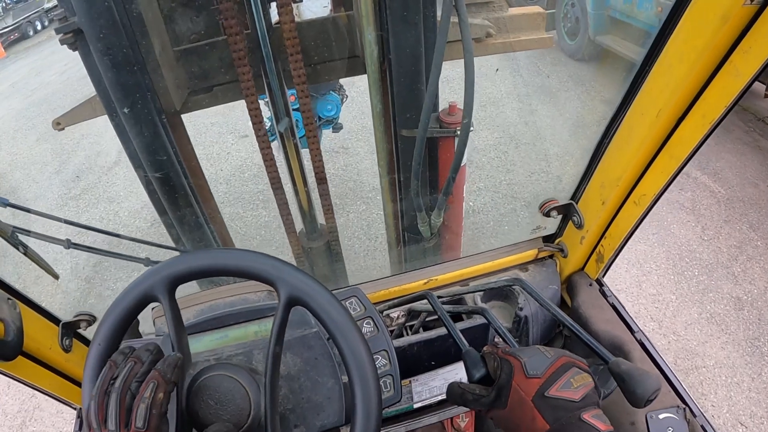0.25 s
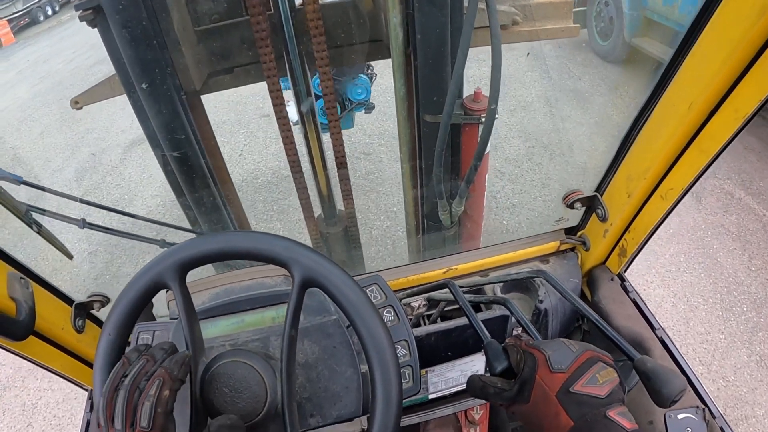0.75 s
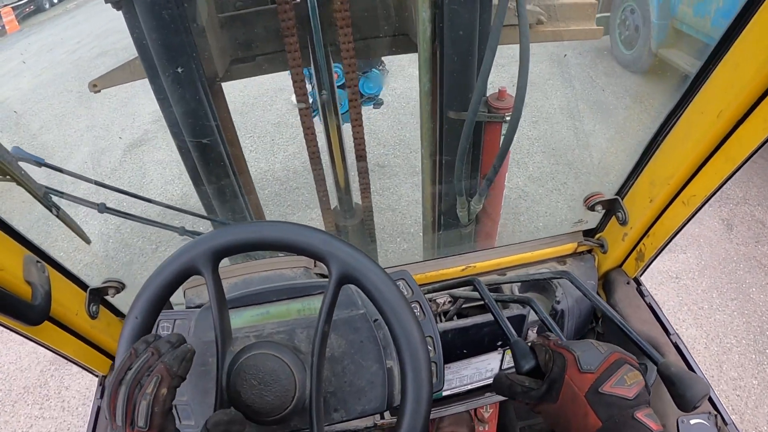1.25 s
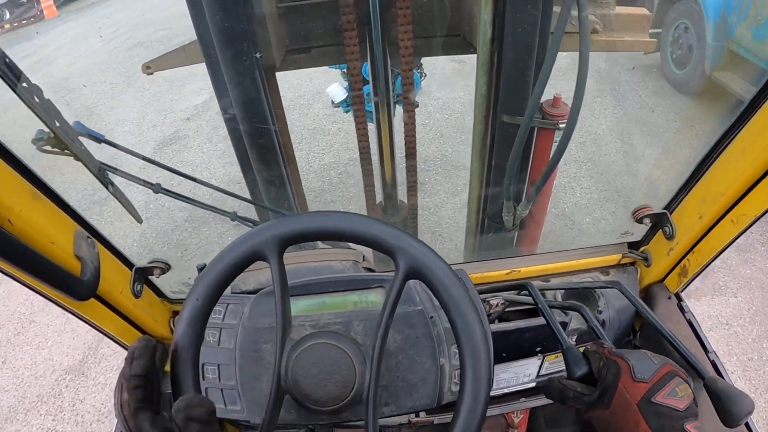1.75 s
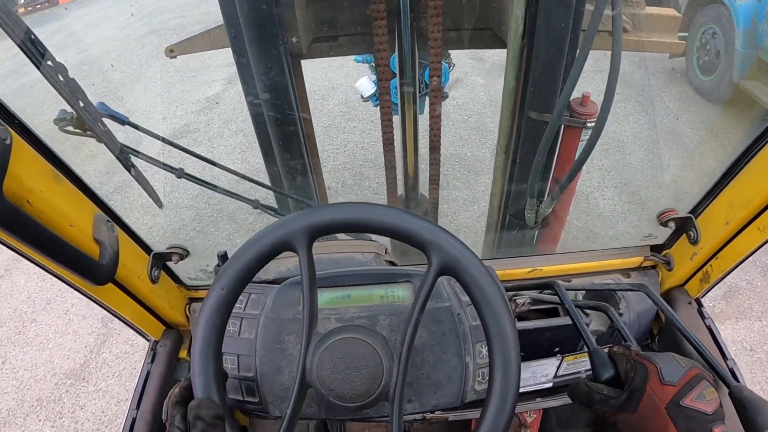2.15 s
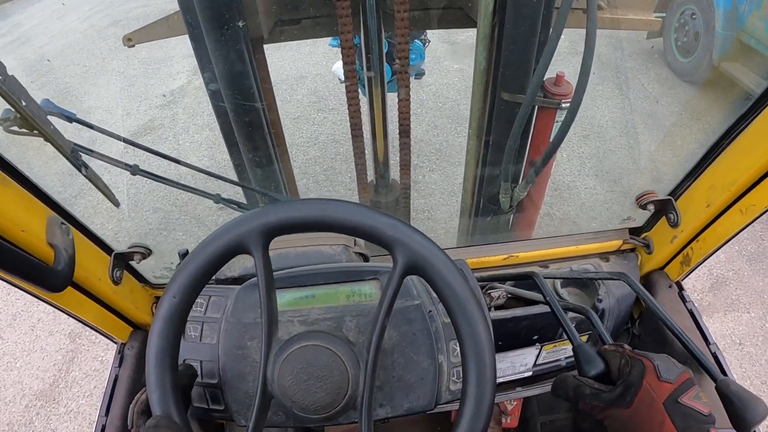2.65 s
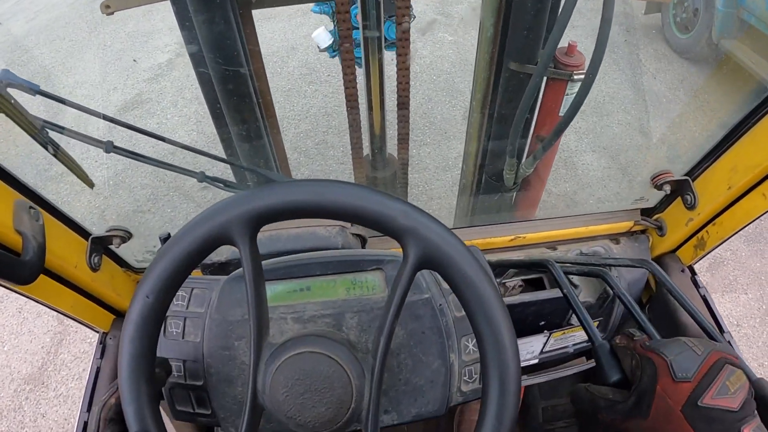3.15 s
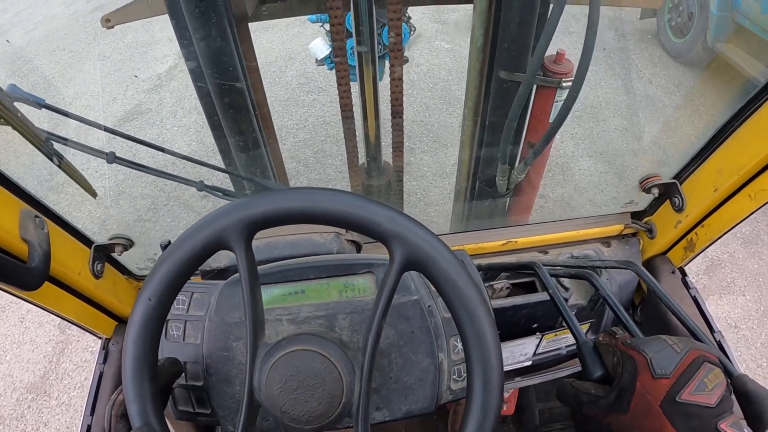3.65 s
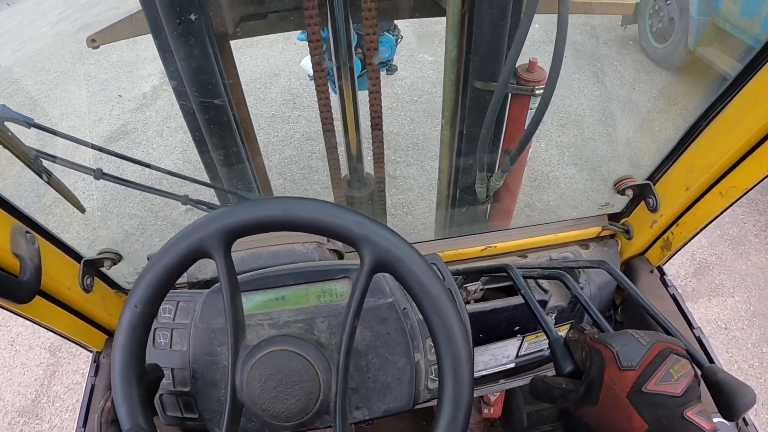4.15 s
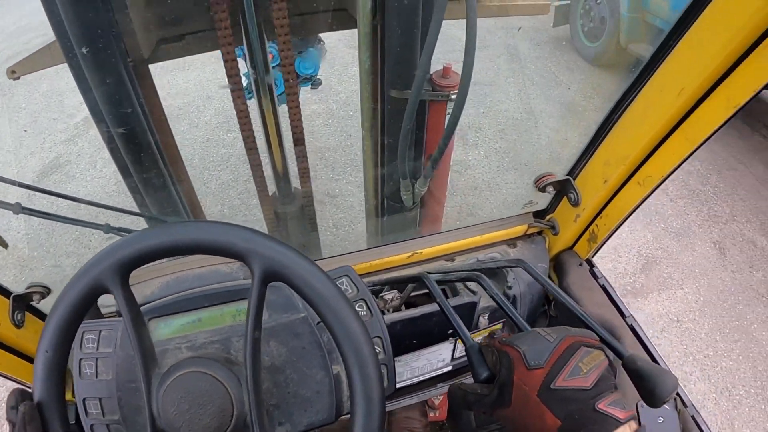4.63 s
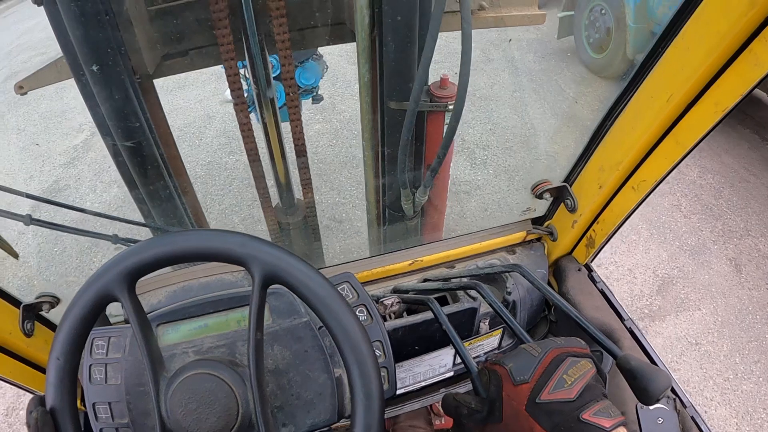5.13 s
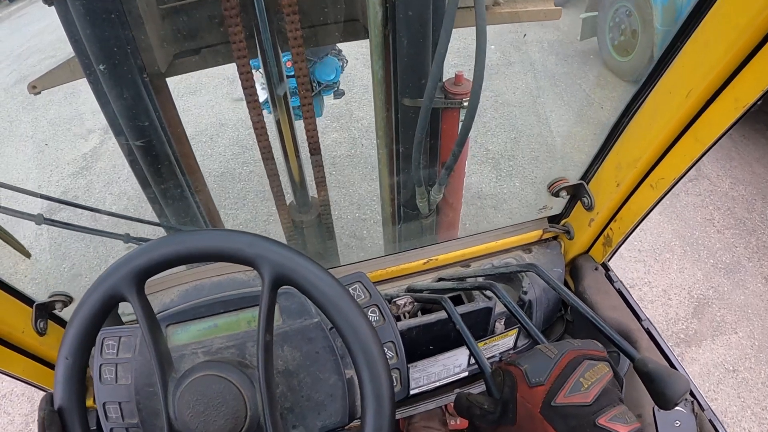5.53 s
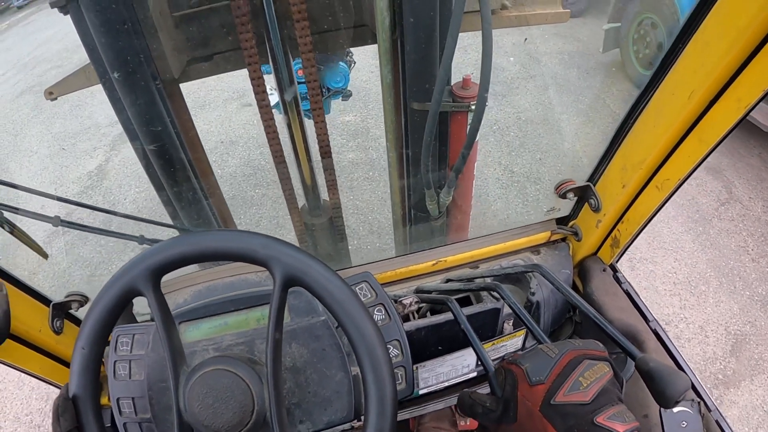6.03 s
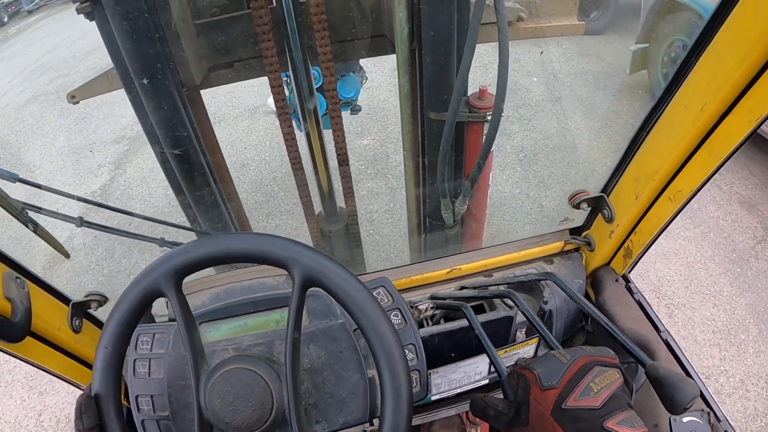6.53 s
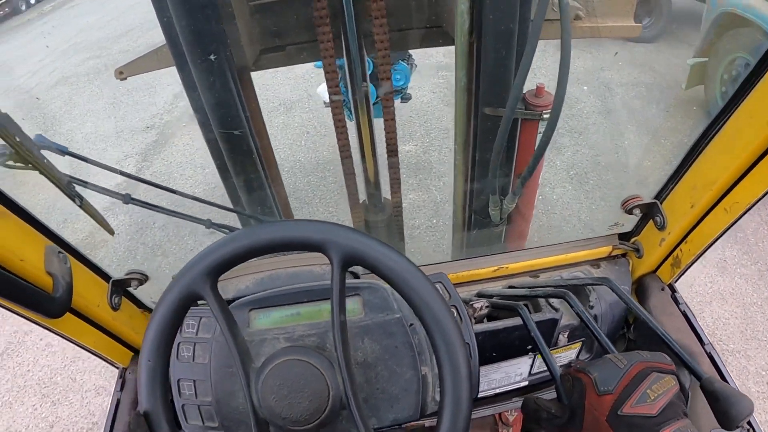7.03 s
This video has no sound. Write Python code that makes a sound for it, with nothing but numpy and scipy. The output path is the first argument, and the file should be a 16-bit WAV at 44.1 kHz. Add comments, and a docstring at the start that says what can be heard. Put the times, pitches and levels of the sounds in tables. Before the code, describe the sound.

A labouring diesel heard from the driver's seat: uneven chugging, a falling pump moan, loose metal rattles, one bright squeak and a late rev.

```python
"""Inside the cab of a diesel forklift that creeps across a yard under load, over the rumble of the drive.
At first the pump labours with a falling moan, and the engine sags and recovers.
After two seconds the engine sags again and surges; then come a strong squeak and its weaker neighbours.
Near five seconds the engine surges most, among the last clunks, and then it settles.
Each firing is a pulse that thumps the cab and rings the block; the other sounds are shaped noise and tones."""
import sys
import numpy as np
from scipy import signal
from scipy.fft import rfft, irfft
from scipy.io import wavfile
from scipy.ndimage import uniform_filter1d

SR = 44100
rng = np.random.default_rng(int(sys.argv[2]) if len(sys.argv) > 2 else 0)


def inscribe(sig):
    """Save sig as 16-bit PCM at rate SR to the path in sys.argv[1].

    A 1-D sig is mono; a 2-D sig holds one channel per row.
    Samples are clipped to [-1, 1] before scaling.
    """
    pcm = np.round(np.clip(np.atleast_2d(sig).T, -1, 1) * 32767)
    wavfile.write(sys.argv[1], SR, pcm.astype(np.int16))


N = 321048

# tone colour of the engine block: (frequency [Hz], level [dB])
BLOCK_COLOUR = [(130, -35.5), (230, 3.5), (310, -15.5), (380, -4), (480, -6), (570, -5.5), (680, -10.5),
                (970, -16), (1230, -19.5), (1700, -24.5), (4000, -50), (9000, -91)]
# ringing tones of the chain links: (frequency [Hz], level [dB])
LINK_MODES = [(3700, -2), (4600, -8), (5300, -3), (6250, -5), (6540, 1), (6850, -3), (8400, -6), (9600, -8),
              (10300, -11)]
IDLE_PER_S = 27  # firings per second from which speed effects are counted


def amp(db):
    """Turns decibels into a plain factor."""
    return 10 ** (np.asarray(db) / 20)


def evened(x):
    """Scales a sound to an average (RMS) strength of 1."""
    return x / np.sqrt(np.mean(x ** 2) + 1e-20)


def read(points, hz):
    """Reads a spectrum table at the given frequencies, on a logarithmic scale."""
    f, value = np.transpose(points)
    return np.interp(np.log(hz + 1), np.log(f + 1), value)


def curve(rows, t):
    """Reads every column of a time table at the times t."""
    s, *columns = np.transpose(rows)
    return [np.interp(t, s, c) for c in columns]


def add(mix, s, sound):
    """Adds a sound to the mix from second s on, cut at the end of the scene."""
    part = mix[..., round(s * SR):][..., :sound.shape[-1]]
    part += sound[..., :part.shape[-1]]


def resonate(x, hz, width):
    """A resonance of gain 1 at hz, fixed or moving: shift hz down to zero, smooth, shift back."""
    r = np.exp(-np.pi * width / SR)
    turn = np.exp(2j * np.pi * np.cumsum(hz * np.ones(x.shape[-1])) / SR)
    smoothed = signal.lfilter([1 - r], [1, -r], x / turn)
    return 2 * (turn * smoothed).real


def causal(x, colour, early=0):
    """Filters x by the shortest response with this colour; early moves a share of it ahead of the blow."""
    hz = abs(np.fft.fftfreq(2 ** 15, 1 / SR))
    log_gain = np.log(amp(read(colour, hz)))
    phase = (1 - early) * signal.hilbert(log_gain).imag
    response = np.fft.ifft(np.exp(log_gain - 1j * phase)).real
    return signal.oaconvolve(x, np.fft.fftshift(response), 'same')


def noise(colour, patchy_db):
    """Coloured noise with drifting patches, partly alike on the left and right."""
    # likeness of left and right: (frequency [Hz], likeness [0 to 1])
    likeness = [(130, 1), (290, 1), (630, 0.9), (1370, 0.81), (3000, 0.97), (8000, 0.59)]
    # how far the left leads: (frequency [Hz], phase [radians])
    left_lead = [(100, -0.19), (860, -0.36), (2800, -1.07), (5500, -0.58)]
    # left level minus right level: (frequency [Hz], difference [dB])
    left_tilt = [(200, 1.5), (1260, 2), (4200, -0.5), (10000, 2)]
    frames, hz = N // 256 + 5, np.fft.rfftfreq(1024, 1 / SR)
    a, b, c, d, patches = rng.standard_normal((frames, len(hz), 5)).T
    patches = uniform_filter1d(patches, size=12, axis=0)  # smooth over frequency
    patches = evened(uniform_filter1d(patches, size=10, axis=1))  # and over time
    same = np.clip(read(likeness, hz), -1, 1)[:, None]
    left = a + 1j * b
    right = same * left + np.sqrt(1 - same ** 2) * (c + 1j * d)
    # half of the difference goes to each side
    skew = (amp(read(left_tilt, hz) / 2) * np.exp(.5j * read(left_lead, hz)))[:, None]
    gain = amp(read(colour, hz)[:, None] + patchy_db * patches)
    z = np.array([left * skew, right / skew]) * gain
    return evened(signal.istft(z, nperseg=1024, noverlap=768)[1][:, :N])


def labour():
    """How hard the pump labours, from 1 down to 0."""
    halfway_s, fade_s = 1.41, 0.92
    return np.clip((halfway_s - np.arange(N) / SR) / fade_s + .5, 0, 1)


def roar():
    """Fan, pump and tyres: steady coloured noise."""
    # (frequency [Hz], level [dB])
    roar_colour = [(60, -35), (128, -12.5), (178, -8.5), (309, -17), (568, -32), (800, -47), (960, -25),
                   (1100, -34), (7640, -62.5), (12200, -99), (13200, -125)]
    return amp(-36) * noise(roar_colour, patchy_db=.7)


def oil_hiss():
    """Oil hisses as treble noise, more while the pump labours, and swells at times."""
    # (frequency [Hz], level [dB])
    hiss_colour = [(2000, -4.5), (4000, -6), (6500, -11), (7700, -11.5), (9000, -17), (12500, -25),
                   (13200, -72.5)]
    # swells: (centre time [s], half length [s], level [dB])
    spurts = [(1.887, 0.15, -55.5), (2.73, 0.33, -60.5), (4.98, 0.37, -63.5)]
    steady_db, labour_db = -62.5, 3
    t = np.arange(N) / SR
    level = amp(steady_db + labour_db * labour())
    level = level + sum(amp(db) * np.exp(-((t - s) / half) ** 2) for s, half, db in spurts)
    return level * noise(hiss_colour, patchy_db=1.2)


def pump_moan():
    """The labouring pump moans: noise through a narrow resonance that falls in pitch."""
    # (time [s], frequency [Hz], level [dB])
    moan_path = [(.3, 362.7, -39.5), (.9, 291, -41), (1.15, 275, -57.5)]
    width_hz = 32
    t = np.arange(N) / SR
    hz, level_db = curve(moan_path, t)
    moan = resonate(rng.standard_normal(N), hz, width_hz)
    moan = evened(resonate(moan, hz, width_hz))
    return amp(level_db - 60 * (t > moan_path[-1][0])) * moan  # all but silent after the last row


def drive():
    """Steady roar, a hiss of oil that swells at times, and the moan of the pump."""
    return roar() + oil_hiss() + pump_moan()


def booms():
    """Uneven ground keeps the low cab modes rolling: noise rings low resonances."""
    # cab modes: (frequency [Hz], width [Hz], level [dB])
    cab_modes = [(43, 9, -6), (68, 9, 3)]
    # strength of the booms: (time [s], level [dB])
    bumps = [(0, -28), (1.1, -23), (1.4, -25.5), (2.5, -28), (2.9, -26), (3.4, -26.5), (5.2, -23.5),
             (6.2, -26.5), (6.6, -21.5), (7.28, -24.5)]
    jolt = rng.standard_normal(N)
    rolling = sum(amp(db) * evened(resonate(resonate(jolt, hz, w), hz, w)) for hz, w, db in cab_modes)
    return amp(curve(bumps, np.arange(N) / SR)[0]) * rolling


def blow_of_noise(hz, octaves, rise, t60):
    """Noise around hz that rises and dies by 60 dB in t60, a little unlike left and right."""
    t, f = np.arange(2 ** 13) / SR, np.fft.rfftfreq(2 ** 13, 1 / SR)
    common, own = rng.standard_normal(len(t)), rng.standard_normal((2, len(t)))
    bell = np.exp(-.5 * (np.log2((f + 1) / hz) / octaves) ** 2)
    bell = bell / np.sqrt(f + hz)  # falls towards the treble
    band = evened(irfft(rfft(common + 0.91 * own) * bell))
    shape = (1 - np.exp(-t / max(rise, 1e-4))) * amp(-60 * t / t60)
    return band * shape / shape.max() * amp([[1.1], [-1.1]])  # louder on the left


def roughened(sound, depth_db, size):
    """Makes the level of a blow uneven by smoothed random swings."""
    swing = evened(uniform_filter1d(rng.standard_normal(sound.shape[1]), size=size))
    return sound * amp(depth_db * swing - 1)


def ticks():
    """Sharp bursts of noise that ring at the link modes, over a short lower body."""
    # (time [s], level [dB], centre frequency [Hz], level of the low body [dB])
    tick_list = [(0.117, -55, 7850, -65), (0.2, -45.5, 3000, -56), (0.517, -44, 3340, -62),
                 (0.598, -46.5, 4670, -40.5), (0.917, -43.5, 2950, -53), (1.188, -50, 3160, -65),
                 (1.255, -44, 3470, -49), (2.8686, -46, 3130, -60), (2.921, -47, 3430, -56),
                 (3.584, -47, 5200, -45), (4.3907, -43, 3100, -45), (6.0702, -49.5, 5600, -47),
                 (6.927, -55, 3440, -60), (7.21, -63, 7500, -67)]
    mix = np.zeros((2, N))
    for s, db, hz, body_db in tick_list:
        tick = blow_of_noise(hz, octaves=0.74, rise=.004, t60=.065)
        rings = sum(amp(3 * rng.standard_normal()) * resonate(tick, f, width=200) for f, _ in LINK_MODES)
        body = blow_of_noise(1480, octaves=.15, rise=.003, t60=.09)
        add(mix, s, amp(db) * (0.99 * tick + 0.5 * rings) + amp(body_db) * body)
    return mix


def clunks():
    """The load clunks on the forks: soft low thuds that ring the fork modes."""
    # (time [s], level [dB], centre frequency [Hz], width [octaves], time to die by 60 dB [s])
    clunk_list = [(0.185, -37, 980, 1, 0.25), (0.229, -48, 1790, 1, 0.23), (0.622, -42, 1070, 0.63, 0.25),
                  (0.781, -44, 1260, 1, 0.1), (.955, -50, 1480, 1, 0.12), (1.567, -47.5, 1324, 0.79, 0.14),
                  (1.915, -49.5, 1840, 0.85, 0.087), (2.972, -43, 910, 1, 0.096),
                  (3.352, -45.5, 1320, 0.82, 0.21), (4.15, -47.5, 1580, 0.71, 0.19),
                  (4.974, -50, 1700, 0.64, 0.076), (5.063, -44.5, 1120, 0.67, 0.1),
                  (5.201, -50, 1380, 0.41, .08), (5.442, -47.5, 1380, 0.49, 0.11),
                  (5.284, -53, 2120, 0.52, 0.073)]
    # ringing tones of the forks: (frequency [Hz], level [dB])
    fork_modes = [(730, -3), (950, -1), (1030, -2), (1350, -1), (1960, -3), (2260, -5), (2520, -6),
                  (3170, -5)]
    mix = np.zeros((2, N))
    for s, db, hz, octaves, t60 in clunk_list:
        thud = blow_of_noise(hz, octaves, rise=0.027, t60=t60)
        thud = roughened(thud, depth_db=3.2, size=250)  # lands in uneven bumps
        rings = sum(amp(mode_db + 3 * rng.standard_normal()) * resonate(thud, f, width=35)
                    for f, mode_db in fork_modes)
        add(mix, s, amp(db) * (thud + 4.2 * rings))
    return mix


def jingles():
    """Chain links grate: an uneven scrape of noise rings through their modes."""
    # (time [s], level [dB], centre of the scrape [Hz])
    jingle_list = [(0.796, -49.5, 3620), (0.974, -59, 7100), (1.112, -51, 4330)]
    mix = np.zeros((2, N))
    for s, db, centre_hz in jingle_list:
        scrape = blow_of_noise(centre_hz, octaves=0.85, rise=.015, t60=0.14)
        scrape = roughened(scrape, depth_db=2.5, size=200)
        rings = sum(amp(mode_db + 3 * rng.standard_normal())
                    * resonate(resonate(scrape, hz, width=110), hz, width=250) for hz, mode_db in LINK_MODES)
        add(mix, s, amp(db) * (amp(14) * rings + 0.6 * scrape))
    return mix


def squeals_and_moan():
    """Faint squeals, groans and a low rising moan from noise through narrow gliding resonances."""
    # (start [s], end [s], first frequency [Hz], last frequency [Hz], width [Hz], level [dB])
    glide_list = [(2.44, 2.83, 4550, 4570, 140, -59.5), (2.58, 2.81, 3065, 3065, 120, -59),
                  (.72, 1.3, 250, 284, 12, -43), (.37, .64, 7700, 7700, 350, -69),
                  (1.0, 2.1, 7750, 7700, 450, -72), (3.66, 3.7, 9600, 9550, 300, -62),
                  (.64, 1.05, 1000, 895, 45, -46.5)]
    mix = np.zeros((2, N))
    for start, end, first_hz, last_hz, width, db in glide_list:
        common, own = rng.standard_normal(2 * SR), rng.standard_normal((2, 2 * SR))
        hz = np.linspace(first_hz, last_hz, round((end - start) * SR))
        glide = (common + 0.11 * own)[:, :len(hz)]
        glide = evened(resonate(resonate(glide, hz, width), hz, width))
        add(mix, start, amp(db) * glide * signal.windows.tukey(len(hz), .4))
    return mix


def squeaks():
    """Metal slips on metal: a near-pure gliding tone with partials catches, swells and lets go."""
    # (start [s], length [s], first frequency [Hz], last frequency [Hz], level [dB],
    #  second partial relative to the first [dB])
    squeak_list = [(0.215, 0.069, 5330, 5450, -40.5, -35), (3.542, 0.028, 5600, 5750, -47.5, -20),
                   (3.568, 0.059, 4870, 4926, -27.5, -19), (3.622, 0.052, 4860, 4740, -47.5, 0.5),
                   (3.641, 0.049, 4860, 4900, -46, -18), (5.236, 0.064, 5350, 5400, -39, -38)]
    grip_s, slip_s, swell_db, edge_db = 0.0093, 0.017, 5.5, -15.5
    mix = np.zeros((2, N))
    for start, length, first_hz, last_hz, db, second_db in squeak_list:
        t = np.arange(0, length, 1 / SR)
        level_db = db + np.interp(t, [0, grip_s, length - slip_s, length], [edge_db, -swell_db, 0, edge_db])
        # the weaker the squeak, the more its grip flutters
        flutter = evened(uniform_filter1d(rng.standard_normal(SR // 4), size=100))[:len(t)]
        flutter = flutter * np.clip((-30 - level_db) / 30, 0, 1)
        turns = np.cumsum(np.linspace(first_hz, last_hz, len(t)) * (1 + .008 * flutter)) / SR
        tone = np.sin(2 * np.pi * turns)
        tone = tone + amp(second_db) * np.sin(2 * np.pi * 2 * turns)
        tone = tone + amp(1.25 * second_db - 22) * np.sin(2 * np.pi * 3 * turns)
        tone = np.sqrt(2) * amp(level_db) * (1 + 0.21 * flutter) * tone
        add(mix, start, signal.windows.tukey(len(t), .15) * tone * amp([[.4], [-.4]]))
    return mix


def cab_thump(firing, speed, second_db):
    """Each firing thumps the cab; two multiples of the firing rate stand out."""
    # (frequency [Hz], level [dB])
    cab_colour = [(4, -56.5), (15, 1.5), (30, -22.5), (55, 7), (85, 7), (110, -3), (135, -16.5),
                  (170, -4.5), (200, -10.5), (240, -25), (300, -29.5), (900, -77.5), (3000, -120)]
    # almost half of the thump builds before the firing, as the charge is squeezed
    thump = evened(causal(firing, cab_colour, early=0.48))
    second = amp(second_db) * resonate(thump, 2 * speed, width=8)
    sixth = amp(-0.5) * resonate(thump, 6 * speed, width=8)
    return thump + second + sixth


def piston_shake(turns):
    """The pistons shake the engine once and, faintly, four to six times a firing."""
    # four, five and six shakes a firing, against the main one: (level [dB])
    fast_shake_db = [-16, -13.5, -13.5]
    shake = np.cos(2 * np.pi * (turns + .13))
    for k, db in enumerate(fast_shake_db, 4):
        shake = shake + amp(db) * np.cos(2 * np.pi * k * turns)
    return np.sqrt(2) * shake


def block_ring(blow, wander, speed):
    """The knock is a soft push that rings the block, at slightly different pitches each firing."""
    # where the knock lingers: (frequency [Hz], width [Hz], level [dB])
    block_modes = [(385, 31, -1), (445.6, 39, -2), (561, 36, 1.5)]
    t = np.arange(3000) / SR
    push = signal.oaconvolve(blow, t * np.exp(-t / 0.00023))[:N]
    knock = causal(push, BLOCK_COLOUR)
    ring = 0.28 * knock
    for (hz, width, db), drift in zip(block_modes, wander):
        ring = ring + amp(db) * resonate(knock, hz * (1 + .01 * drift), width)
    return amp(-19 + 0.45 * (speed - IDLE_PER_S)) * evened(ring)


def clatter_and_snap(blow, speed, thump_db):
    """Block-coloured noise clatters after each firing, rattles steadily and snaps in the treble."""
    rattle_db, rattle_db_per_hz, labour_db = -43, 1.07, 5.5
    pickup_db_per_hz_s, pickup_s = 0.3324, 0.34  # more rattle while the engine picks up
    snap_db, snap_db_per_hz = -9.5, 2.4
    t = np.arange(3000) / SR
    metal = noise(BLOCK_COLOUR, patchy_db=.8)
    burst = evened(signal.oaconvolve(blow, (1 - np.exp(-t / .002)) * np.exp(-t / .009))[:N])
    clatter = metal * amp(thump_db - 30.0) * burst

    pickup = uniform_filter1d(np.gradient(speed) * SR, round(pickup_s * SR), mode='nearest')
    steady_db = rattle_db + rattle_db_per_hz * (speed - IDLE_PER_S) + labour_db * labour()
    steady_db = steady_db + pickup_db_per_hz_s * np.maximum(pickup, 0)
    rattle = amp(steady_db) * signal.lfilter(*signal.butter(1, 350, 'high', fs=SR), metal)

    # differencing twice lifts the treble of the same noise
    treble = evened(uniform_filter1d(np.diff(metal, 2, prepend=[[0, 0]] * 2), size=6))
    snap = signal.oaconvolve(blow, t / .004 * np.exp(-t / .004))[:N] * treble
    # hard firings snap more, and so does a faster engine up to 4 firings per second over idle
    level_db = 2 * thump_db + snap_db + snap_db_per_hz * np.minimum(speed - IDLE_PER_S, 4)
    return clatter + rattle + amp(level_db) * snap


def engine():
    """Uneven firings thump the cab and knock the block while the pistons shake."""
    # (time [s], speed [firings per second])
    speed_path = [(0.0, 28.35), (0.475, 27.21), (0.638, 22.84), (0.85, 20.43), (1.232, 26.16),
                  (1.61, 25.15), (2.141, 27.07), (2.494, 25.63), (2.77, 18.38), (2.999, 31.75),
                  (3.235, 27.65), (3.938, 27.0), (4.593, 26.69), (4.722, 27.75), (5.172, 36.24),
                  (5.38, 31.16), (6.049, 29.88), (6.68, 26.43), (7.28, 26.8)]
    # (time [s], thump level [dB], piston shake level [dB], lift at twice the firing rate [dB])
    load_path = [(0, -21.5, -22, -23), (.55, -27.5, -29.5, -5), (1.1, -23, -21.5, -19),
                 (1.6, -20.5, -38.5, -1.5), (2.45, -21, -46, 4), (2.7, -23.5, -30, 13.5),
                 (2.95, -14.5, -28.5, -26), (3.2, -22.5, -26, -22), (4.5, -20.5, -33, -5.5),
                 (4.95, -18, -27, -3.5), (5.1, -20.5, -16, -27), (5.28, -30, -15.5, -36),
                 (5.42, -16.5, -25.5, -36), (6.7, -22.5, -31, -12), (7.28, -20.5, -38, 2.5)]
    uneven_db, uneven_labour_db = .8, 2.3
    t = np.arange(N) / SR
    speed = curve(speed_path, t)[0]
    thump_db, shake_db, second_db = curve(load_path, t)

    # one turn here is one firing; the crank runs unevenly, most of all while the pump labours
    sway = evened(resonate(resonate(rng.standard_normal(N), 9, 10), 9, 10))
    turns = .38 + np.cumsum(speed) / SR + (.004 + .03 * labour()) * sway
    fired = np.flatnonzero(np.diff(np.floor(turns)))

    # each firing has its own strength, knock and block pitches
    chance = rng.standard_normal((len(fired), 5))
    firing, blow = np.zeros((2, N))
    firing[fired] = amp((uneven_db + uneven_labour_db * labour()[fired]) * chance[:, 0])
    blow[fired] = firing[fired] * amp(1.1 * chance[:, 1])
    upcoming = np.minimum(np.searchsorted(fired, np.arange(N)), len(fired) - 1)
    wander = chance[upcoming, 2:].T

    thump = amp(thump_db) * cab_thump(firing, speed, second_db)
    shake = amp(shake_db) * piston_shake(turns)
    ring = np.hypot(amp(thump_db), amp(shake_db - 6)) * block_ring(blow, wander, speed)
    return thump + ring + shake + clatter_and_snap(blow, speed, thump_db)


def scene():
    """All sources in the cab, from the background to the engine."""
    return drive() + booms() + ticks() + clunks() + jingles() + squeals_and_moan() + squeaks() + engine()


def record(dry):
    """The input stage rounds off the highest peaks; then a filter cuts the top of the treble."""
    edge_hz = 15000
    rounded = .7 * np.tanh(dry / .7)
    low_pass = signal.firwin(511, edge_hz, window=("kaiser", 9), fs=SR)
    return signal.oaconvolve(rounded, low_pass[None], "same")


dry = scene()
out = record(dry)
inscribe(out)
```